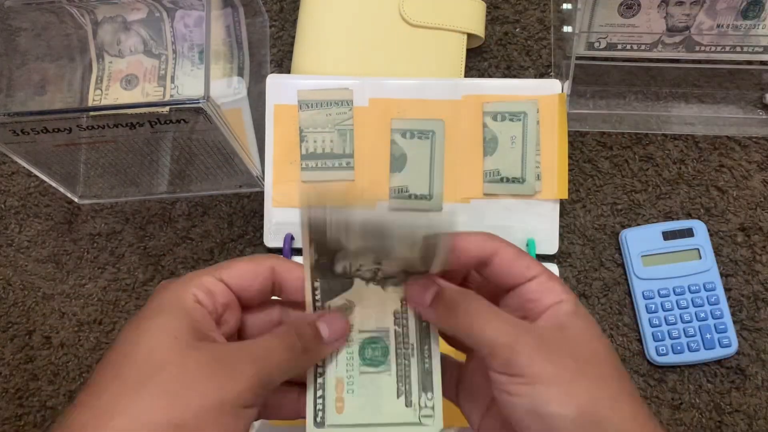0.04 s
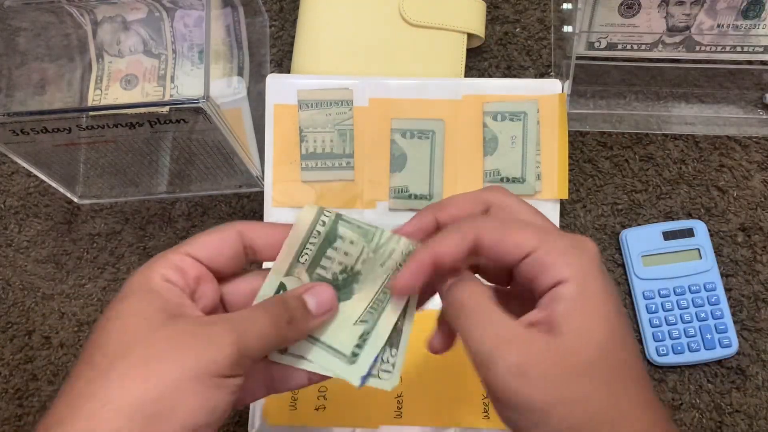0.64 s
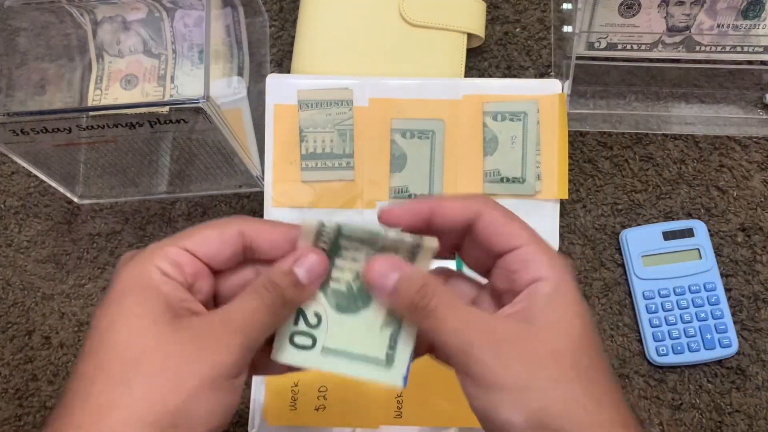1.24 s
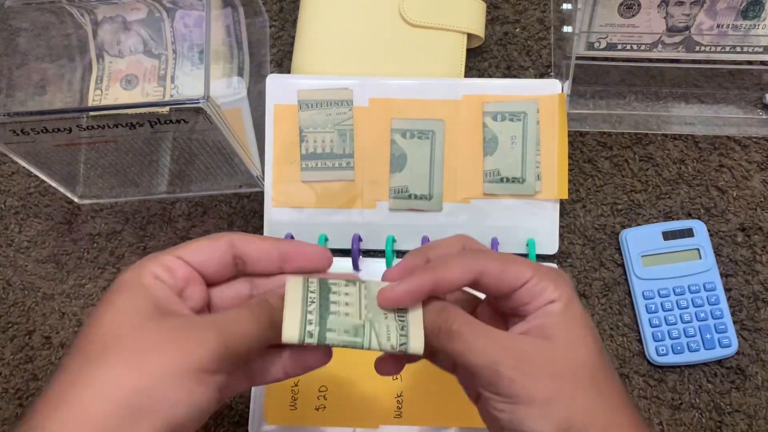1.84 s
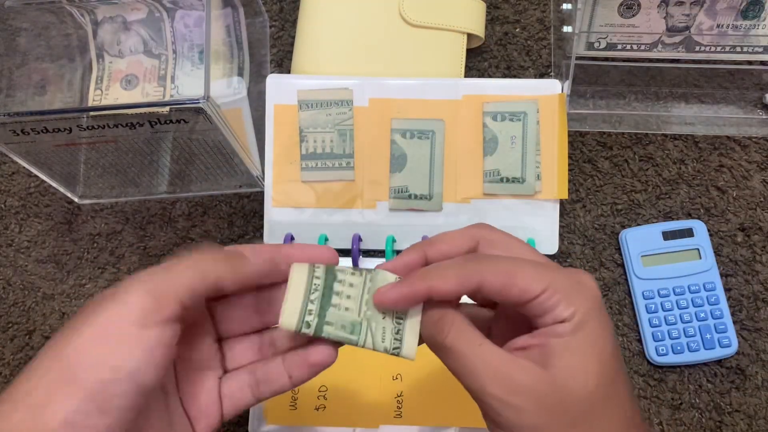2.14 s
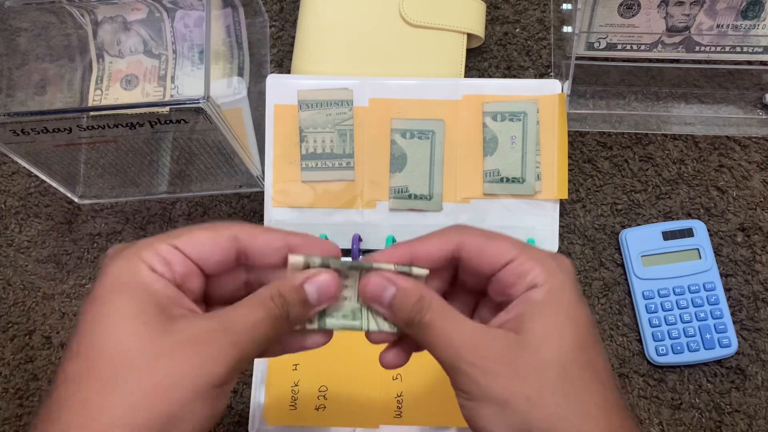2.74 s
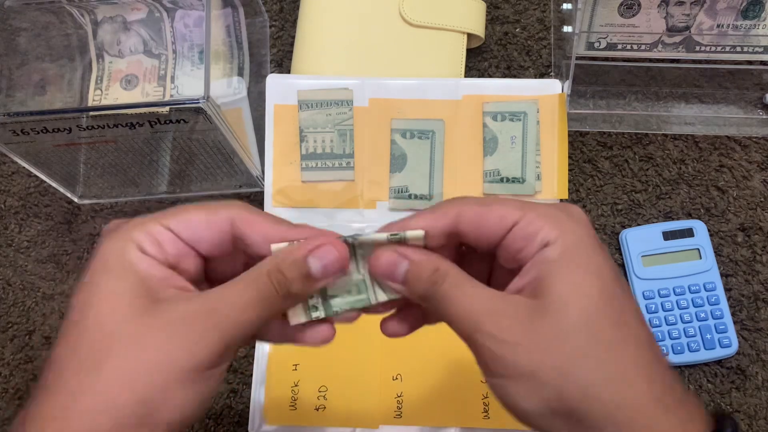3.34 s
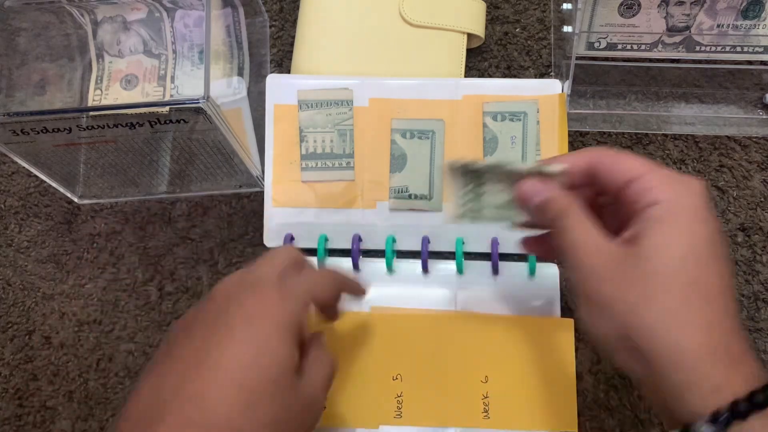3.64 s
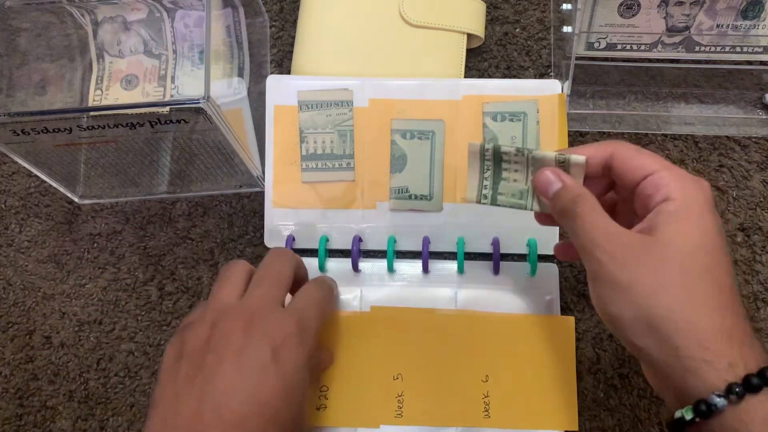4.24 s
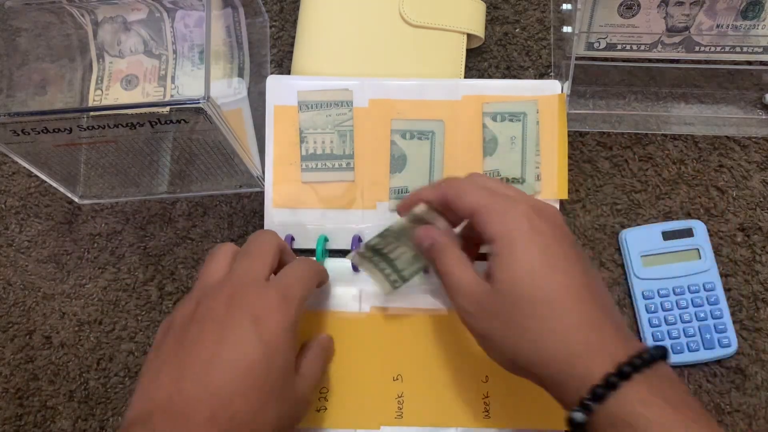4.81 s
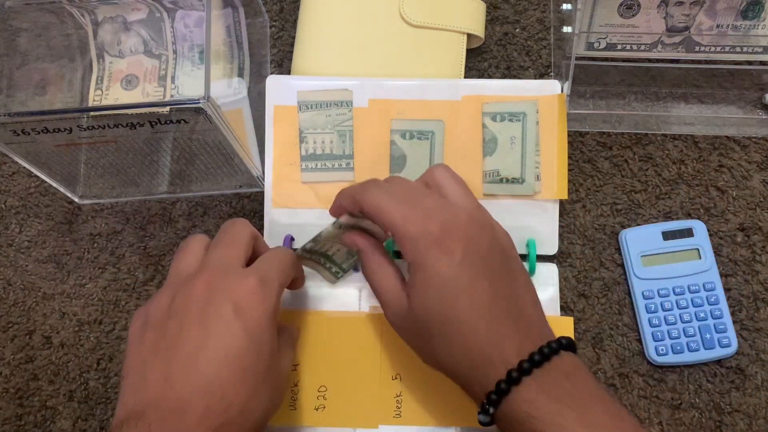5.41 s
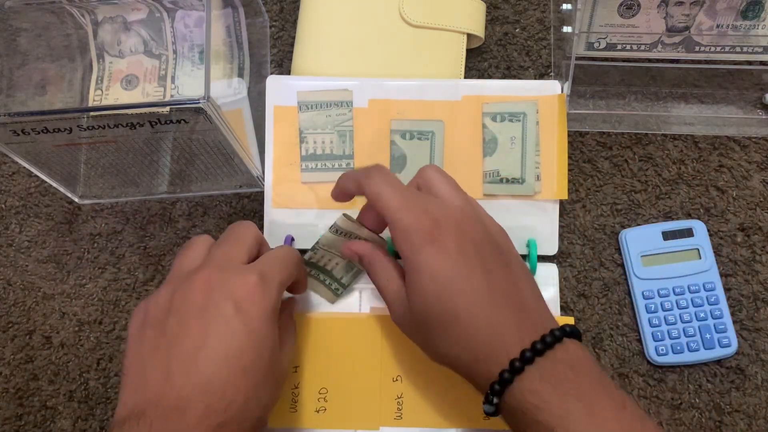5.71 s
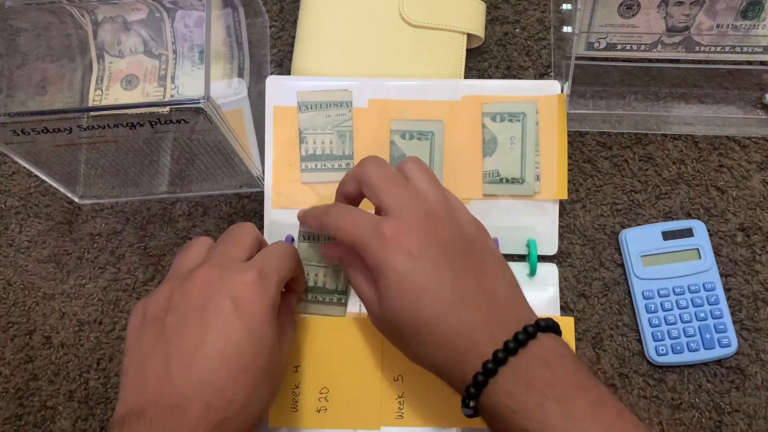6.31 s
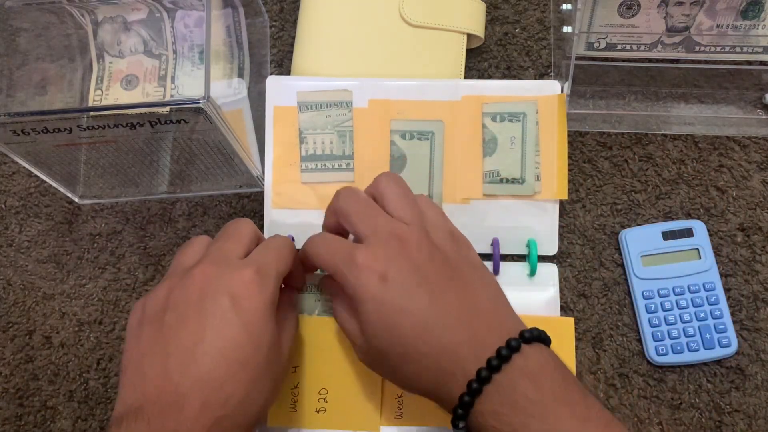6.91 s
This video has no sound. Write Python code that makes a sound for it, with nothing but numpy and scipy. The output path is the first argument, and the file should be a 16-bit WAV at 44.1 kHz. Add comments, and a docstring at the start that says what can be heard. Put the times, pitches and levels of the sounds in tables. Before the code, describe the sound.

A paper banknote is folded with sharp snaps and crackly rustling, then slid softly into a plastic binder pocket.

```python
"""Folding a banknote into a binder pocket

A small, dead room with a low, wavering mains hum; a binder lies on the carpet. Close to a phone's
microphone, hands fold a banknote and tuck it into a plastic pocket. The stiff paper buckles with sharp
snaps, and hisses and crackles as it slides under the fingers and over the plastic.
The phone's two ports hear it slightly out of step."""
import sys
import numpy as np
from scipy import signal
from scipy.fft import rfft, irfft, next_fast_len
from scipy.io import wavfile
from scipy.ndimage import uniform_filter1d, map_coordinates

SR = 44100
rng = np.random.default_rng(int(sys.argv[2]) if len(sys.argv) > 2 else 0)


def to_wav(s):
    """Save 16-bit WAV."""
    ch = np.atleast_2d(s).T  # columns
    pcm = np.round(np.clip(ch, -1, 1) * 32767)  # PCM
    wavfile.write(sys.argv[1], SR, pcm.astype(np.int16))


N = 315787

# spectrum of skin on paper: frequency_hz, level_db
FINGER_SPECTRUM = [(60, -15.5), (150, 1), (300, -2.5), (600, -5), (1250, -1), (1750, 3), (2400, -19),
                   (5000, -42)]
# spectrum of paper on the plastic pocket: frequency_hz, level_db
POCKET_SPECTRUM = [(300, -15), (700, -9), (1100, -7.5), (1400, 2.5), (2300, -1), (3000, -9.5), (5000, -27)]


def amp(db):
    """Decibels to gain."""
    return 10 ** (np.asarray(db) / 20)


def unit(x):
    """x scaled to rms 1."""
    return x / np.sqrt(np.mean(x ** 2) + 1e-20)


def along(points, hz):
    """Rows of frequency_hz, value, read on a log-frequency axis."""
    knots_hz, values = np.transpose(points)
    return np.interp(np.log(hz + 1), np.log(knots_hz + 1), values)


def bump(hz, centre_hz, octaves):
    """A bell of height 1 on a log-frequency axis."""
    return np.exp(-(np.log2((hz + 1) / centre_hz) / octaves) ** 2)


def curves(rows):
    """One value per sample for each column after the time."""
    time_s, *columns = np.transpose(rows)
    return [np.interp(np.arange(N) / SR, time_s, column) for column in columns]


def wobble(per_s):
    """A smooth random curve with per_s knots a second."""
    knots = rng.standard_normal(int(N * per_s / SR) + 4)
    return map_coordinates(knots, [np.arange(N) * per_s / SR])


def filtered(x, response):
    """x through a complex frequency response."""
    size = next_fast_len(N + SR // 2)
    return irfft(rfft(x, size) * response(np.fft.rfftfreq(size, 1 / SR)), size)[..., :N]


def shaped(x, spectrum):
    """x coloured by a spectrum, at rms 1."""
    return unit(filtered(x, lambda hz: amp(along(spectrum, hz))))


def causal(gain_db):
    """The response with these gains that rings only after it is struck."""
    cepstrum = irfft(np.log(amp(gain_db)))
    size = len(cepstrum)
    cepstrum[1:size // 2] *= 2
    cepstrum[size // 2 + 1:] = 0
    return np.exp(rfft(cepstrum))


def room_tone():
    """Mains hum and low rumble waver and dip together, over a faint even hiss."""
    # base level of hum and rumble: time_s, level_db
    levels = [(0, -59), (1.2, -65.5), (1.5, -56), (2.2, -66.5), (2.7, -63.5), (4.2, -66), (5.4, -65),
              (6.3, -69), (7.16, -69)]
    # brief dips in both: time_s, half_length_s, depth_db
    dips = [(0.296, 0.028, 19), (1.084, 0.084, 22), (1.61, 0.076, 25.5)]
    # mains lines: pitch_hz, level_db re base, share of the wavering followed
    mains_lines = [(59.1, -5, 0.96), (119.9, -12.5, .5)]
    # spectra of rumble and hiss: frequency_hz, level_db
    rumble_spectrum = [(15, -33.5), (25, -21), (40, -10), (58, 10), (75, -0.5), (100, -8), (150, -12),
                       (250, -28), (600, -51)]
    hiss_spectrum = [(100, 7), (190, 17), (400, 10.5), (560, 5), (1150, 6), (1750, 12), (2200, 1),
                     (5000, -4), (12000, -1), (15600, -6.5), (16100, -23.5)]
    # how far these differ between the ports: frequency_hz, side_to_mid_ratio
    width = [(60, 0.2), (130, 0.1), (300, 1), (900, 1), (1700, 0.96), (2400, 0.98), (4500, 0.082),
             (15000, .35)]
    t = np.arange(N) / SR
    base_db, = curves(levels)
    dip_db = sum(db * np.exp(-((t - s) / half_s) ** 4) for s, half_s, db in dips)
    waver_db = 2.5 * wobble(per_s=12) - dip_db
    hum = 0
    for pitch_hz, db, share in mains_lines:
        tone = np.sqrt(2) * np.sin(2 * np.pi * (pitch_hz * t + rng.random()))
        hum += amp(base_db + db + share * waver_db) * tone
    rumble = amp(base_db + waver_db - 2.5) * shaped(rng.standard_normal((2, N)), rumble_spectrum)
    hiss = amp(-77.5) * shaped(rng.standard_normal((2, N)), hiss_spectrum)
    mid, side = rumble + hiss
    mid = filtered(mid, lambda hz: 1 / np.hypot(1, along(width, hz)))
    side = filtered(side, lambda hz: along(width, hz) / np.hypot(1, along(width, hz)))
    return hum + np.array([mid + side, mid - side])


def swell(t, peak_s, rise_s, fall_s, drop_db=21.5, roundness=1.026):
    """Level in dB re its peak of a stroke that speeds up and slows down."""
    away = np.maximum((peak_s - t) / rise_s, (t - peak_s) / fall_s)
    return -drop_db * np.clip(away, 0, 9) ** roundness


def handling(steps=4000):
    """Finger strokes add in power: rub, murmur and edge levels in dB and mean resonance in Hz."""
    # the note is doubled over, folded again, pinched flat, then pushed into the pocket:
    # peak_s, rise_s, fall_s, rub_db, murmur_db re rub, edge_db re rub, span_resonance_hz
    strokes = [ (0.025, 0.052, 0.093, -66.5, 3.5, -5, 2780), (0.113, .07, 0.15, -61.5, -8, -1.5, 3070),
               (0.218, 0.042, 0.042, -54, 1.5, 2, 3060), (0.323, 0.024, 0.023, -63, -2, 9, 2900),
               (0.404, .052, 0.062, -47, -15.5, -2, 2740), (0.56, 0.063, 0.068, -49, -8.5, -5, 2900),
               (0.687, 0.089, .115, -53.5, -12, 0.5, 3220), (0.835, .1, .11, -60.5, -17.5, -4.5, 3500),
               (0.952, 0.037, 0.059, -58, -5.5, 4, 3200), (1.125, 0.034, 0.021, -74.5, -8, 7.5, 2980),
               (1.241, 0.036, 0.036, -59.5, -13, -2.5, 3000), (1.345, 0.012, 0.029, -59, 4, -14, 2840),
               (1.465, 0.095, 0.029, -54.5, -3.5, -3.5, 2840), (1.625, 0.13, 0.13, -84, 7, 20.5, 2840),
               (1.699, 0.0238, 0.02, -70, 4, -15.5, 2900), (1.805, 0.079, 0.081, -58.5, 2.5, -5, 3060),
               (1.889, .17, .32, -63, 4.5, -11, 3000), (2.079, .085, 0.12, -54, -8.5, -4, 3460),
               (2.159, 0.095, 0.076, -77, 12, -5.5, 2970), (2.288, .035, 0.083, -58, 1.5, -5.5, 3010),
               (2.346, 0.053, 0.11, -48.5, -10, -5.5, 3010), (2.402, 0.078, 0.022, -43, -20.5, 2, 3960),
               (2.511, 0.032, 0.037, -67, -26, -10.5, 4080), (2.629, 0.054, 0.055, -50, -10, -10, 4140),
               (2.771, 0.025, 0.038, -50, -32.5, 0, 5830), (2.861, 0.13, 0.075, -63, -6.5, -2.5, 2680),
               (3.017, 0.035, 0.033, -51.5, -15.5, -0.5, 4370), (3.097, .03, 0.022, -60.5, -21, 7.5, 4550),
               (3.158, 0.029, 0.041, -61, -5.5, -5, 4960), (3.242, 0.034, 0.035, -50.5, -18, 3, 6040),
               (3.336, 0.033, 0.036, -59.5, -5, -6, 5000), (3.491, 0.082, 0.092, -57.5, -20, -3, 4650),
               (3.545, .032, 0.031, -50.5, -18.5, -2.5, 4620), (3.7, .3, 0.32, -83.5, -9.5, 5.5, 4410),
               (3.83, .03, .05, -84, 4.5, -2, 4400), (4.279, 0.029, 0.044, -53.5, -20, 2.5, 3594),
               (4.57, 0.077, 0.061, -63.5, -7.5, -4, 3564), (4.771, 0.25, 0.41, -63, -16, -6, 3620),
               (4.857, 0.072, 0.045, -61, -26, -0.5, 5000), (5.19, 0.056, 0.096, -68, -2.5, -20, 5260),
               (5.48, 0.055, 0.041, -58, -9, -1.5, 6690), (5.525, 0.022, 0.019, -53.5, -7.5, -2.5, 6700),
               (5.85, .35, .4, -80, -0.5, 4, 4500), (6.35, 0.35, .5, -81.5, -10, 4, 3990),
               (6.428, 0.053, 0.2, -63, -10, -4.5, 3020), (6.59, 0.073, 0.067, -74.5, -4, -2.5, 3037),
               (6.667, 0.019, 0.049, -64, -7, -1, 2970), (6.82, 0.13, 0.11, -75, -6.5, -4.5, 3010)]
    # the note merely held: rub_db, murmur_db re rub, edge_db re rub, span_resonance_hz
    held = (-87, -8.5, 2, 4006)
    t = np.linspace(0, N / SR, steps)
    rub_db, murmur_db, edge_db, span_hz = np.array([row[3:] for row in strokes] + [held]).T[..., None]
    swells_db = np.array([swell(t, *row[:3]) for row in strokes] + [0 * t])
    power = amp(rub_db + swells_db) ** 2
    levels_db = [10 * np.log10(np.sum(power * amp(db) ** 2, axis=0)) for db in (0, murmur_db, edge_db)]
    mean_span_hz = np.sum(power * span_hz, axis=0) / power.sum(axis=0)
    return curves(np.transpose([t, *levels_db, mean_span_hz]))


def friction(spectrum, slips_per_s, spread_db, smooth):
    """Fibres catch and slip: tiny kicks of uneven size over a smooth hiss."""
    caught = rng.random(N) < slips_per_s / SR
    strength, sign, hiss = rng.standard_normal((3, N))
    slips = np.zeros(N)
    slips[caught] = amp(spread_db * np.minimum(strength[caught], 2.5)) * np.sign(sign[caught])
    return shaped(unit(slips) + smooth * hiss, spectrum)


def flexing(x, span_hz, ring_db, patchy_db, octaves=0.5, size=512):
    """As the note bends, its main resonance moves and its many small ones drift; loudness is kept."""
    hz, t, frames = signal.stft(x, SR, nperseg=size)
    centre_hz = np.interp(t, np.arange(N) / SR, span_hz)
    drift = rng.standard_normal(frames.shape)
    for _ in range(2):
        drift = uniform_filter1d(uniform_filter1d(drift, size=3, axis=0), size=14, axis=1)
    gain = amp(ring_db * bump(hz[:, None], centre_hz, octaves) + patchy_db * unit(drift))
    power = np.mean(abs(frames) ** 2, axis=1, keepdims=True)
    gain /= np.sqrt(np.sum(power * gain ** 2, axis=0) / power.sum())
    return signal.istft(frames * gain, SR, nperseg=size)[1][:N]


def sliding(rub_db, murmur_db, edge_db, span_hz):
    """Paper slides on paper, skin and plastic: a dull finger murmur, a grainy rub and edge hiss."""
    # spectra of the note's rubbing face and hissing edges: frequency_hz, level_db
    rub_spectrum = [(600, -31.5), (1200, -18), (1700, -4), (2300, 0.5), (2900, 3), (3900, 2.5), (5000, 0),
                    (6200, 4.5), (8500, -26), (14000, -40)]
    edge_spectrum = [(3500, -30.5), (6000, -9), (7000, 2), (8800, 0), (11500, -2), (15300, 2), (15900, -10),
                     (16400, -26)]
    murmur = friction(FINGER_SPECTRUM, slips_per_s=500, spread_db=4, smooth=0.8)
    rub = friction(rub_spectrum, slips_per_s=600, spread_db=4.5, smooth=1.1)
    edge = friction(edge_spectrum, slips_per_s=1500, spread_db=5, smooth=1.2)
    murmur = flexing(murmur, span_hz, ring_db=0, patchy_db=1.8)
    rub = flexing(rub, span_hz, ring_db=8, patchy_db=0.5)
    edge = flexing(edge, span_hz, ring_db=3.5, patchy_db=-1.0)
    judder_db = wobble(per_s=90)  # the grip judders and shakes all three
    return amp(judder_db) * (amp(murmur_db) * murmur + amp(rub_db) * rub + amp(edge_db) * edge)


def burst(gain_db, t60_s, kick, give_db, slow_s=0.0018, size=3072):
    """The paper gives, kicks a quarter of the way in, and bending waves bounce about."""
    t = (np.arange(size) - size // 4) / SR
    envelope = amp(np.where(t < 0, give_db + 60 * t / 0.005, -60 * t / t60_s))
    waves = rng.standard_normal(size) * envelope
    waves[size // 4] += kick
    hz = np.fft.rfftfreq(size, 1 / SR)
    # bending waves speed up as the root of frequency, so the treble arrives first
    lag_cycles = slow_s * (2 * np.sqrt(1000 * hz) - hz * np.sqrt(1000 / 12000))
    x = irfft(rfft(waves) * causal(gain_db(hz)) * np.exp(-2j * np.pi * lag_cycles))
    return x / np.linalg.norm(x) * np.sqrt(SR / 200)  # the energy of 5 ms at rms 1


def touches(per_s=14):
    """Fingertips shifting on the note and the pocket make faint soft taps, each at its own pitch."""
    out = np.zeros(N + SR)
    for when, strength, pitch in rng.random((round(per_s * N / SR), 3)):
        pitch_hz = 300 * 7 ** pitch
        tap = burst(lambda hz: along(FINGER_SPECTRUM, hz) / 2 + 14 * bump(hz, pitch_hz, 0.17),
                    t60_s=0.041, kick=3, give_db=-14)
        out[int(when * N):][:len(tap)] += amp(-83.5 + 2.3 * strength ** 2) * tap
    return out[:N]


def buckling(rows):
    """The sheet pops through: its free span rings, knocks hollowly, pushes air and cracks at the crease."""
    # spectra of the four parts of a buckle: frequency_hz, level_db
    ring_spectrum = [(1000, -48), (1700, -17.5), (2300, -4), (2800, 3), (4700, 5.5), (6800, -2.5),
                     (9000, -23.5), (14000, -43.5)]
    knock_spectrum = [(350, -44.5), (650, -21), (850, -5), (1100, -1), (1900, 1), (2400, -8), (4000, -41)]
    thump_spectrum = [(50, -12.5), (130, -7), (330, -1.5), (480, 0), (700, -3.5), (1000, -19.5),
                      (1800, -50)]
    crack_spectrum = [(3500, -33), (6000, -4.5), (7200, -3), (8800, 6), (11000, -1.5), (15500, -9),
                      (16500, -25.5)]
    out = np.zeros(N + SR)
    for start_s, level_db, ring_hz, knock_db, knock_hz, thump_db, crack_db in rows:
        # hard buckles are over at once; gentle contacts are drawn out into little scrapes
        soft = 1 + 0.45 * np.clip((-39 - level_db) / 20, 0, 1)
        ring = burst(lambda hz: along(ring_spectrum, hz) + 10 * bump(hz, ring_hz, 0.22),
                     t60_s=0.014 * soft, kick=4 / soft, give_db=-15.5)
        knock = burst(lambda hz: along(knock_spectrum, hz) + 11 * bump(hz, knock_hz, 0.21),
                      t60_s=0.013 * soft, kick=7 / soft, give_db=-12)
        thump = burst(lambda hz: along(thump_spectrum, hz), t60_s=0.065, kick=9, give_db=-24)
        # light cracks involve only the thinnest fibres and reach higher
        sparkle_db = 8 * np.clip((-23 - level_db) / 20, 0, 1)
        crack = burst(lambda hz: along(crack_spectrum, hz) + sparkle_db * bump(hz, 14000, 0.3),
                      t60_s=0.012 * soft, kick=5 / soft, give_db=-21.5)
        snap = ring + amp(knock_db) * knock + amp(thump_db) * thump + amp(crack_db) * crack
        out[round(start_s * SR) - len(snap) // 4:][:len(snap)] += amp(level_db) * snap
    return out[:N]


def crinkles(rub_db, span_hz, per_s=10, scatter_db=4):
    """Tiny buckles at random moments, about as strong as the rubbing that sets them off."""
    count = round(per_s * N / SR)
    starts = rng.integers(SR // 20, N, count)
    rows = []
    for i, (strength, pitch, hollow) in zip(starts, rng.standard_normal((count, 3))):
        level_db = rub_db[i] - 0.5 + scatter_db * strength
        ring_hz = span_hz[i] * 2 ** (0.3 * pitch)
        knock_hz = 1500 * 2 ** (0.4 * hollow)
        rows.append((i / SR, level_db, ring_hz, -8, knock_hz, -16, -5))
    return buckling(rows)


def snaps():
    """The stiff note snaps as it is folded and ticks against the pocket."""
    # buckles: start_s, level_db, ring_hz, knock_db, knock_hz, thump_db, crack_db (parts re level_db)
    buckles = [(0.2137, -23, 6900, -6.5, 1136, -37, -7), (0.2273, -50.5, 4780, 7, 1702, -12, -5),
               (0.4703, -50, 2520, -18, 2020, -11, -10), (0.551, -48, 2980, 1, 1630, -7, -12.5),
               (0.561, -41, 3350, -1.5, 1750, -9.5, -24.5), (0.8968, -62, 3450, -7, 1590, -22, -14),
               (0.9022, -48, 3400, -24, 2070, -18, -16), (0.9247, -52.5, 2500, 3, 875, -2, -16),
               (0.9405, -23, 3170, -13, 964, -21.5, -5.5), (0.9466, -42, 2860, 0.5, 1657, -16, -13),
               (1.1328, -55, 2670, -4, 1890, -19, -11.5), (1.2315, -51, 5300, -8.5, 820, -15, -3.5),
               (1.2481, -53.5, 3800, -10, 1530, -4, -6.5), (1.3433, -57, 2520, 0, 810, 4.5, -11),
               (1.4057, -59.5, 2350, 4, 800, 10.5, -5), (1.4257, -49.5, 2680, -3.5, 1590, -13, -12),
               (1.4494, -56.5, 2710, -21, 1680, -28, 4.5), (1.4808, -22.5, 2960, -6, 1463, -16, -2.5),
               (1.761, -71, 2890, 13, 1210, 17, -14), (1.8952, -59.5, 2930, -32, 1620, 3.5, -13.5),
               (2.0806, -20, 4620, -17, 1800, -25.5, -3.5), (2.1703, -56.5, 3200, -15.5, 970, -36, -7),
               (2.2853, -40, 2850, -1.5, 2030, -22, -25.5), (2.3239, -17.5, 2790, -17.5, 1340, -26, -12),
               (2.383, -37.5, 4750, -8, 2270, -18.5, -1), (2.408, -43, 3670, -31, 1290, -26.5, 2.5),
               (2.5859, -47, 4600, -19, 873, -11.5, -1), (2.6106, -29, 3820, -10.5, 946, -38, 0.5),
               (2.6416, -44.5, 3700, -10, 1960, -40.5, -17), (2.772, -41, 5800, -23, 2080, -44.5, -5.5),
               (2.859, -50.5, 2540, -14, 2110, -21, -21.5), (3.0099, -52.5, 3230, -16.5, 2070, -25.5, -2.5),
               (3.0214, -47.5, 5470, -36, 1430, -22.5, 3.5), (3.156, -63.5, 4950, -3.5, 1436, -18.5, 2),
               (3.2435, -41.5, 5910, -15, 1770, -28, 0.5), (3.3318, -49.5, 6250, -9, 1550, -30, -4),
               (3.5288, -47.5, 3883, -15, 1776, -30, -4.5), (3.652, -80, 2755, 10.5, 1594, -7, -11.5),
               (4.16, -76, 3447, -15, 1600, -14.5, -6), (4.2571, -39.5, 3620, -32, 2070, -42, 0),
               (4.3216, -56.5, 4270, -6.5, 1296, -21.5, -0.5), (4.359, -70, 5040, -17.5, 1515, -21.5, 2.5),
               (4.4754, -57.5, 4850, -24.5, 1575, -31, 9.5), (4.5478, -49.5, 4870, -23.5, 974, -28.5, -11),
               (4.5701, -47, 3750, -9.5, 1490, -18.5, -9), (4.722, -60.5, 3950, -18, 1210, -17.5, -8),
               (4.8603, -56.5, 5150, -7, 2030, -32, 0.5), (5.102, -67, 6150, -13.5, 1800, -11, -8.5),
               (5.1596, -54, 3900, -15, 1080, -17, -1.5), (5.1688, -57, 3410, -10, 1124, -10, -6),
               (5.2004, -52, 5800, -15, 874, -18, -11.5), (5.3869, -61.5, 2586, -6.5, 1357, -17, -16),
               (5.4791, -60.5, 6550, 3.5, 1690, -20.5, 4), (5.5272, -50.5, 6700, -14.5, 1667, -17, -9),
               (5.6516, -62.5, 6330, -9, 1572, -23, -3.5), (5.9401, -61, 4050, -6, 1684, -20.5, -5.5),
               (6.1958, -72.5, 2700, -11, 834, -4, -8.5), (6.2672, -77.5, 2670, 7, 1277, -3, -9),
               (6.4178, -48, 5460, -14, 1238, -39, 1), (6.6619, -60, 2914, -2, 1820, -21.5, -4),
               (6.8033, -68.5, 2960, -3.5, 1790, -14, -14.5), (6.8598, -63.5, 3360, -7.5, 2090, -17.5, -6),
               (6.904, -72, 2880, -10, 1804, -13.5, -19.5), (7.139, -71, 3185, -13.5, 826, -25, -2.5)]
    return buckling(buckles)


def dragging(span_hz):
    """The stiff folded edge rasps over the pocket's plastic film."""
    # pushes of the edge over the film: peak_s, rise_s, fall_s, level_db
    drags = [(4.751, 0.083, 0.093, -71.5), (4.86, .06, 0.059, -66), (4.99, .12, 0.17, -77.5)]
    t = np.arange(N) / SR
    speed = sum(amp(db + swell(t, peak_s, rise_s, fall_s)) for peak_s, rise_s, fall_s, db in drags)
    rasp = friction(POCKET_SPECTRUM, slips_per_s=1100, spread_db=1.5, smooth=0.84)
    rasp = flexing(rasp, span_hz, ring_db=-3.5, patchy_db=1.0)
    return speed * amp(1.03 * wobble(per_s=66)) * rasp


def squeezing(start_s=5.57, end_s=5.735, fade_s=0.04, level_db=-69.5, from_hz=1540, to_hz=1637):
    """The pocket's mouth grips the note: one narrow resonance of the film, rising as it tightens."""
    t = np.arange(N) / SR
    grip = np.clip(1 + np.minimum(t - start_s, end_s - t) / fade_s, 0, 1)
    film_hz = np.interp(t, [start_s, end_s], [from_hz, to_hz])
    rub = friction(POCKET_SPECTRUM, slips_per_s=1100, spread_db=2.5, smooth=0.89)
    envelope = amp(level_db + 1.5 * wobble(per_s=80)) * grip
    return envelope * flexing(rub, film_hz, ring_db=19.5, patchy_db=-0.5, octaves=0.24)


def reflections(x, delay_s=0.0028, width=0.35, size=256):
    """The walls' short answer: one tail common to both ports, one in which they differ."""
    # decay of the small room: frequency_hz, t60_s
    decay = [(200, 0.08), (1500, 0.067), (5000, 0.1), (15000, 0.11)]
    hz, t, frames = signal.stft(rng.standard_normal((2, SR // 3)), SR, nperseg=size)
    tails = signal.istft(frames * amp(-60 * t / along(decay, hz)[:, None]), SR, nperseg=size)[1]
    tails = np.pad(tails / np.linalg.norm(tails[0]), ((0, 0), (round(delay_s * SR), 0)))
    mid, side = signal.fftconvolve(x[None], tails, axes=1)[:, :N]
    return np.array([mid + width * side, mid - width * side]) / np.hypot(1, width)


def scene():
    """The note close up, with faint reflections and room tone behind it."""
    rub_db, murmur_db, edge_db, span_hz = handling()
    paper = sliding(rub_db, murmur_db, edge_db, span_hz) + dragging(span_hz) + squeezing() + touches()
    paper = paper + snaps() + crinkles(rub_db, span_hz)
    return paper + amp(-16.5) * reflections(paper) + room_tone()


def record(dry, top_hz=16700):
    """The phone's two ports differ in phase and level; nothing passes above the band limit."""
    # phase between the ports: frequency_hz, left_lead_rad
    port_phase = [(0, 0), (70, 0), (120, -.5), (170, -1), (280, -1), (400, -.6), (700, -1.1), (1000, -.45),
                  (1550, .3), (2300, 1.5), (3400, 1.4), (4600, 3.1), (8950, 9.4), (13250, 15.7),
                  (17000, 20.5)]
    # balance of the ports: frequency_hz, left_minus_right_db
    port_balance = [(100, 0), (400, 0), (750, -3), (1100, 0), (2000, -7), (2900, -5.5), (3800, 0),
                    (16000, 0)]

    def ports(hz):
        """Left and right responses, at a mean power of 1 within the band."""
        lead_rad = np.interp(hz, *np.transpose(port_phase))
        left = amp(along(port_balance, hz) / 2) * np.exp(0.5j * lead_rad)
        pair = np.array([left, 1 / left])
        return pair / np.sqrt(np.mean(abs(pair) ** 2, axis=0)) * (hz < top_hz)
    return filtered(dry, ports)


dry = scene()
out = record(dry)
to_wav(out)
```